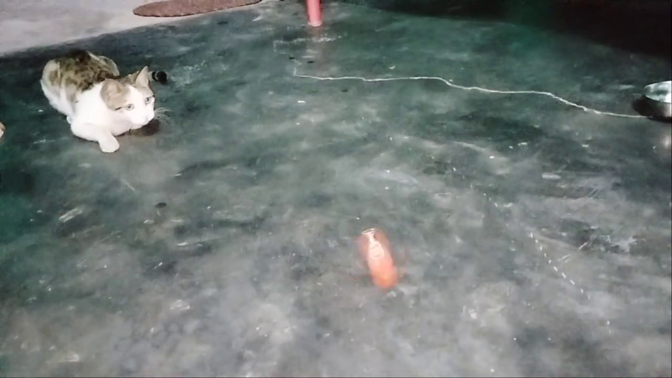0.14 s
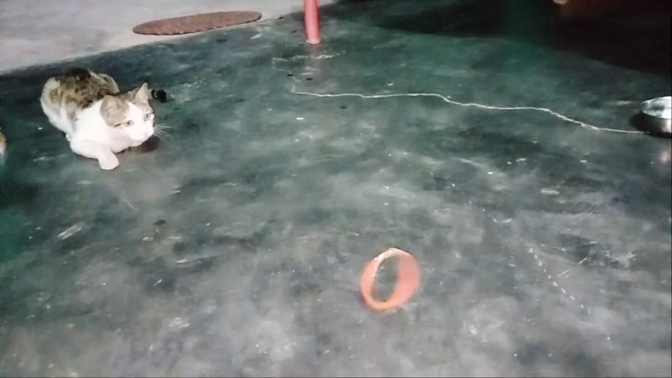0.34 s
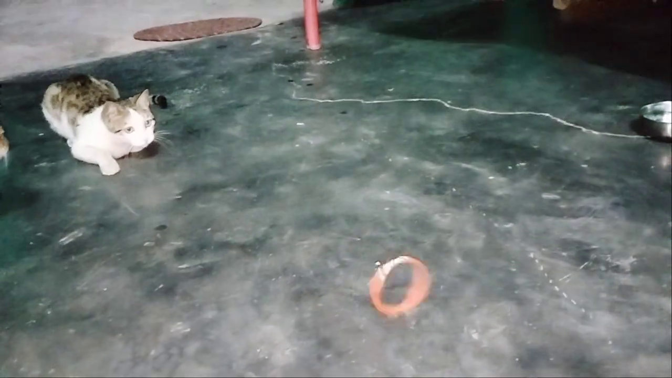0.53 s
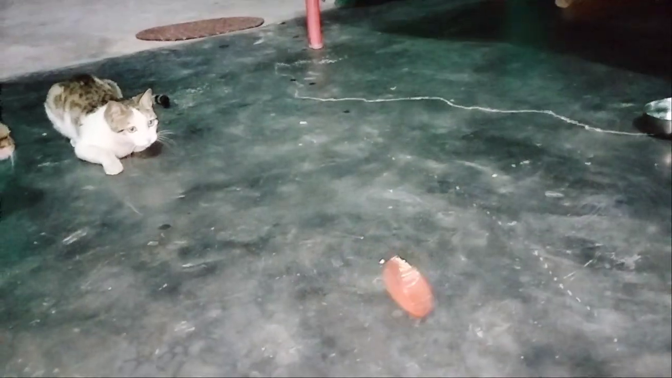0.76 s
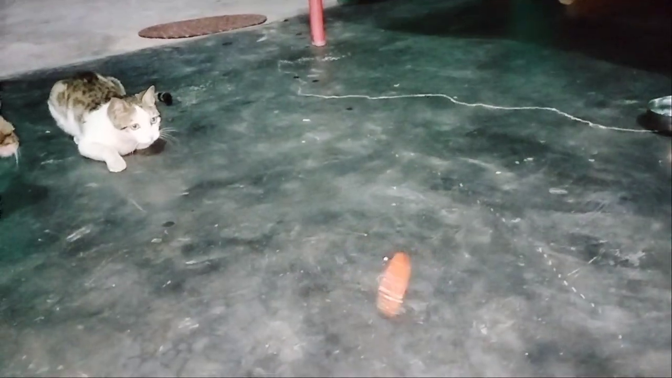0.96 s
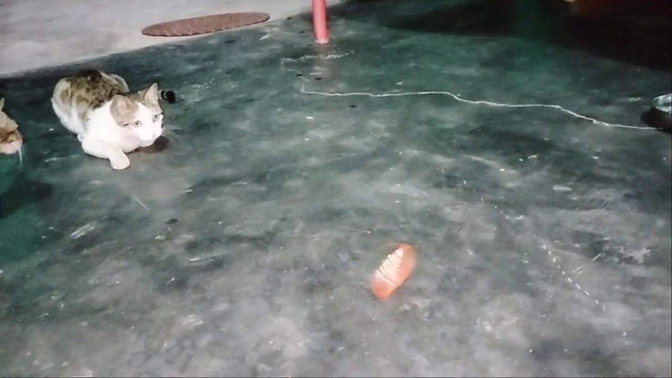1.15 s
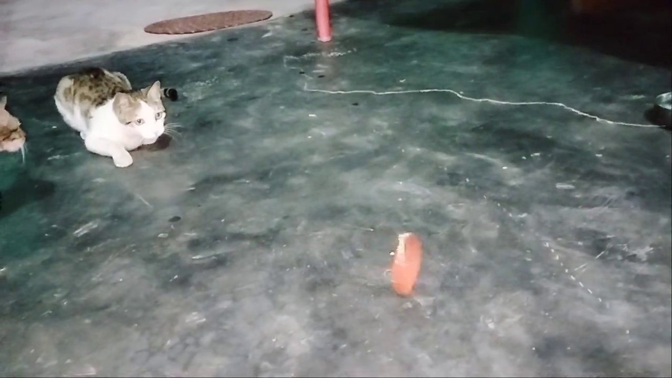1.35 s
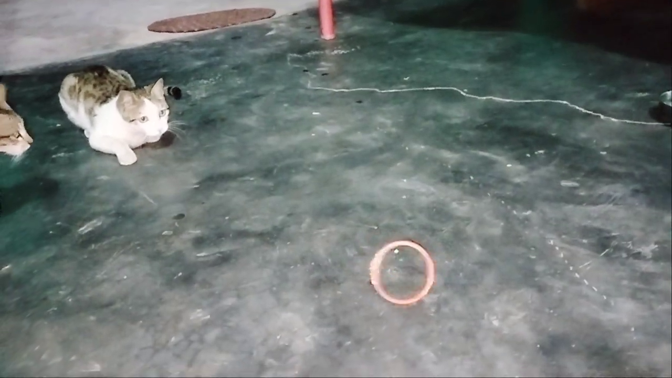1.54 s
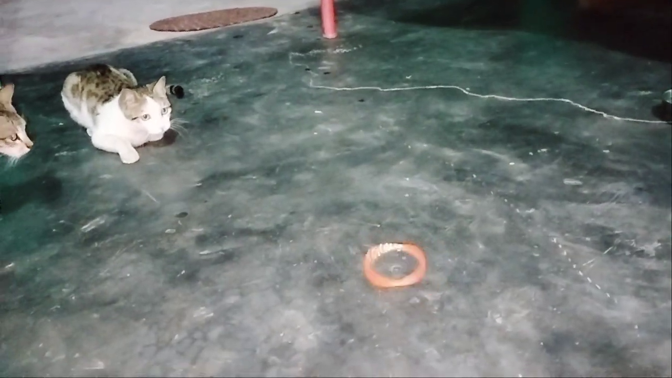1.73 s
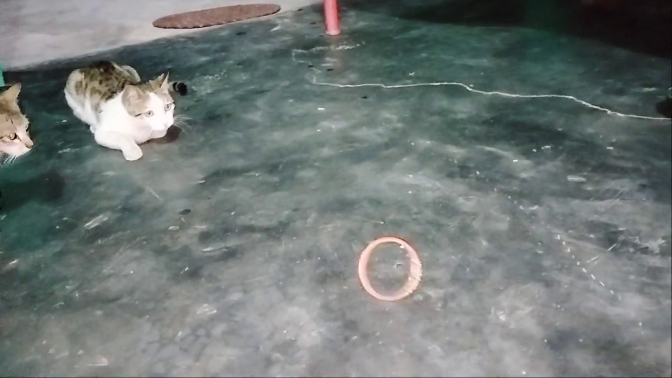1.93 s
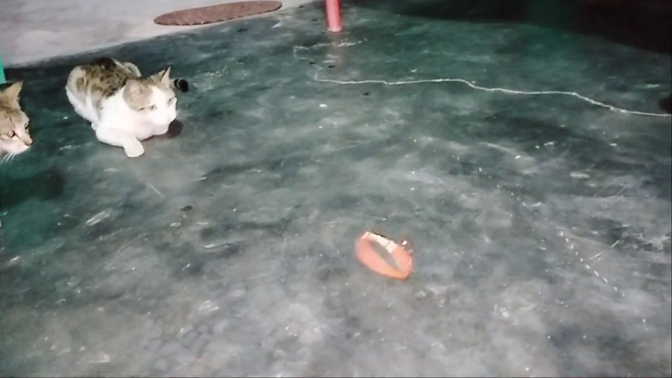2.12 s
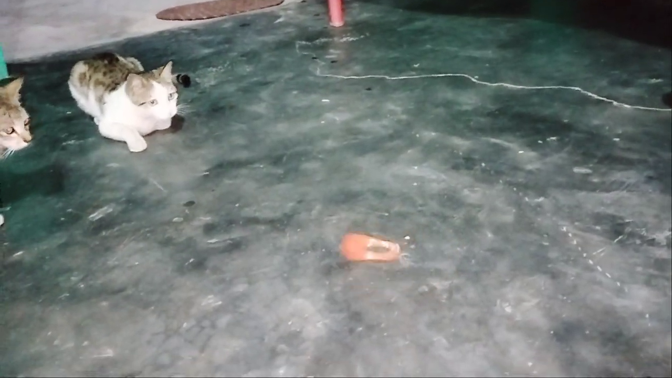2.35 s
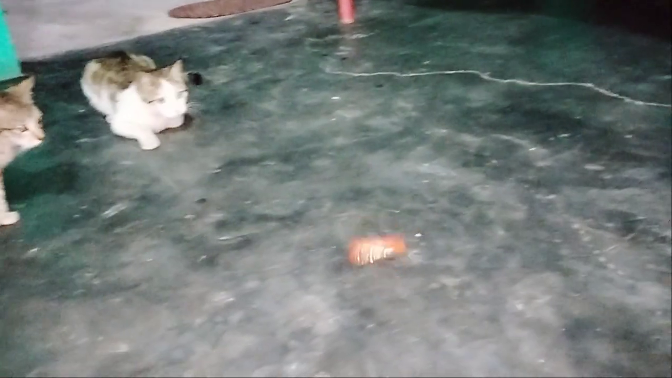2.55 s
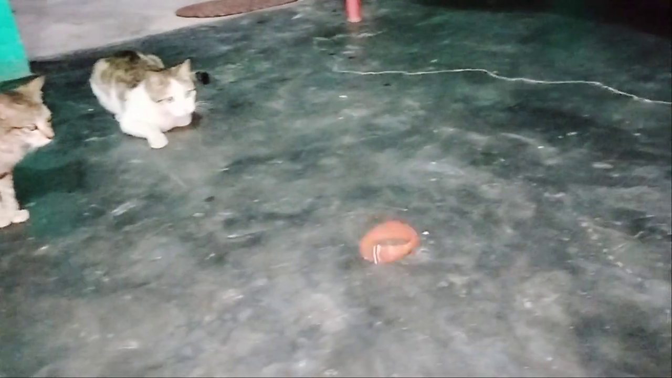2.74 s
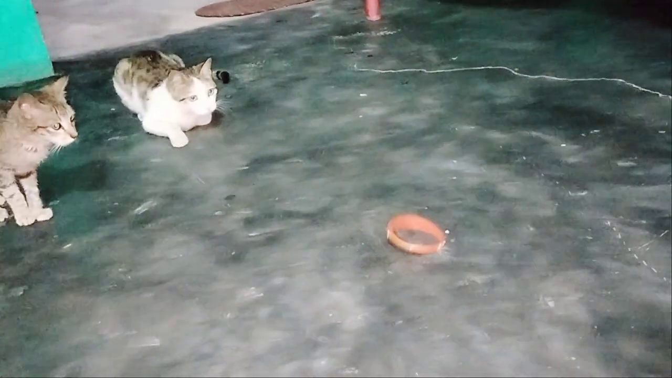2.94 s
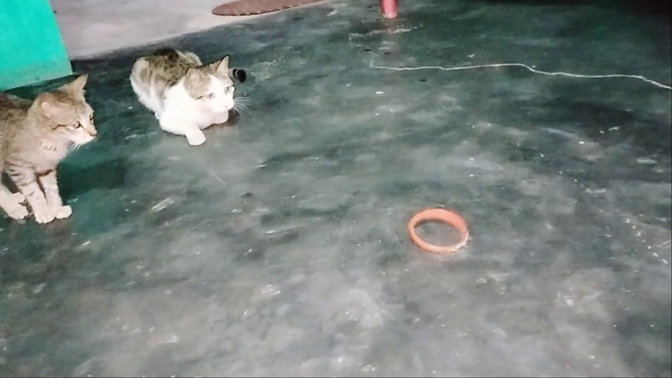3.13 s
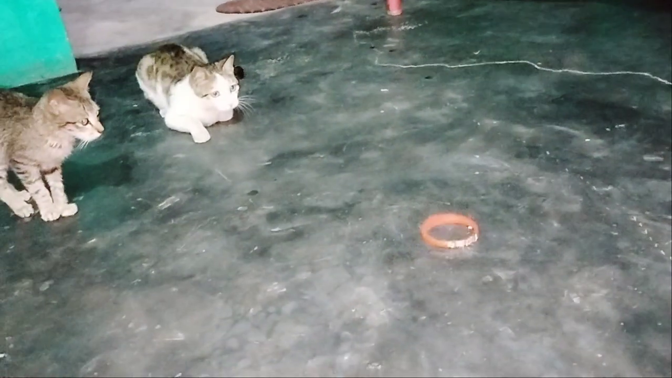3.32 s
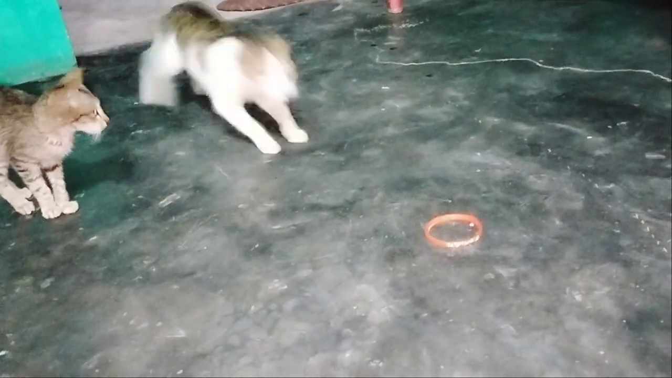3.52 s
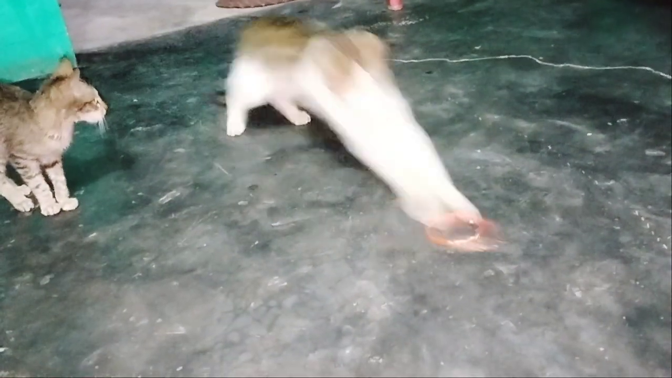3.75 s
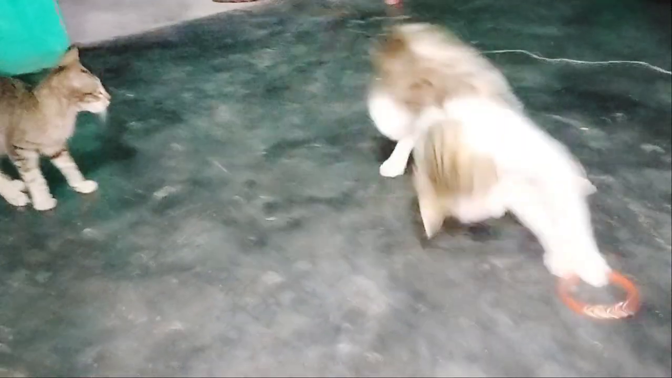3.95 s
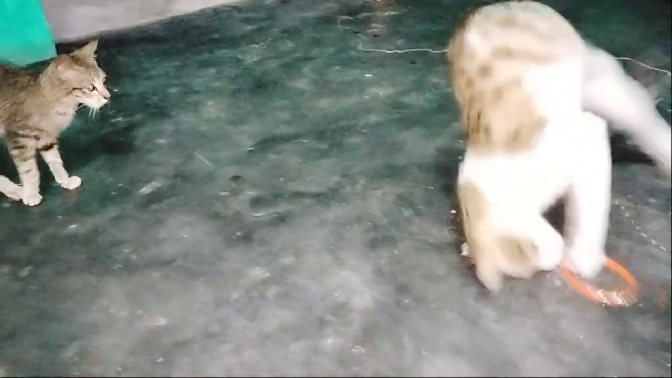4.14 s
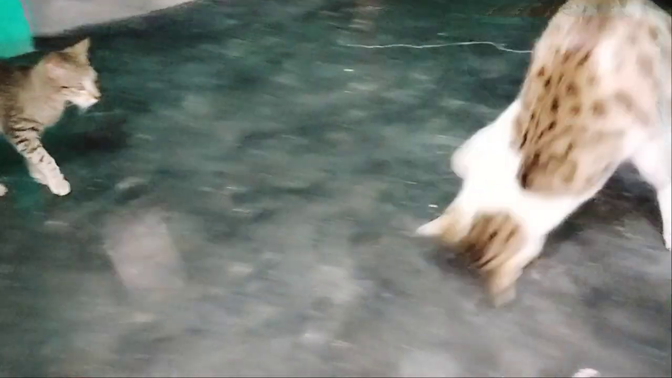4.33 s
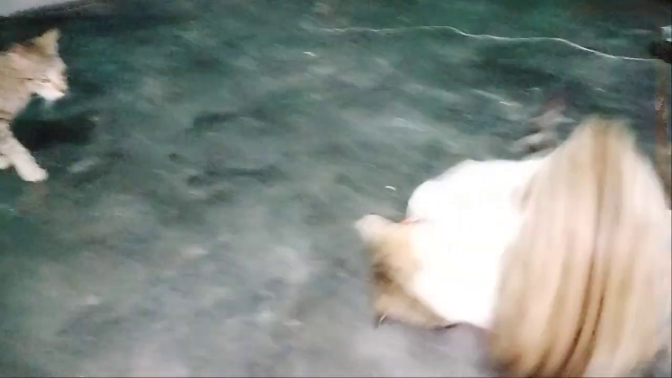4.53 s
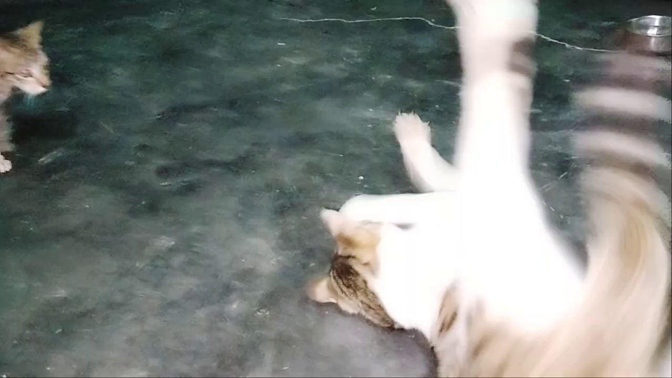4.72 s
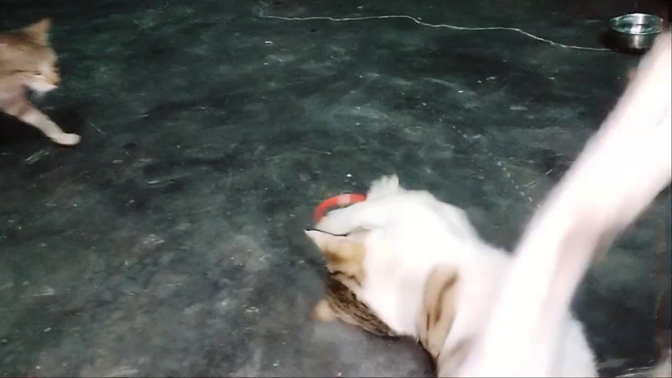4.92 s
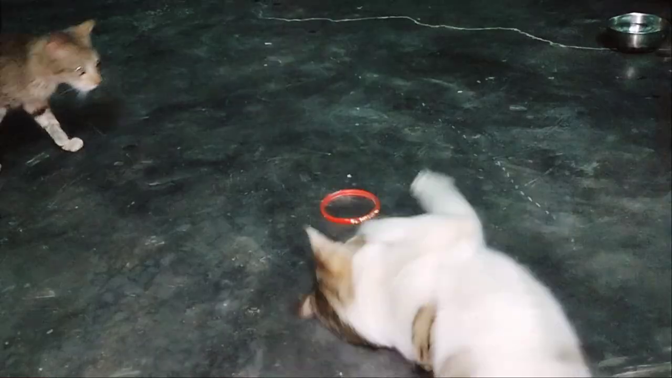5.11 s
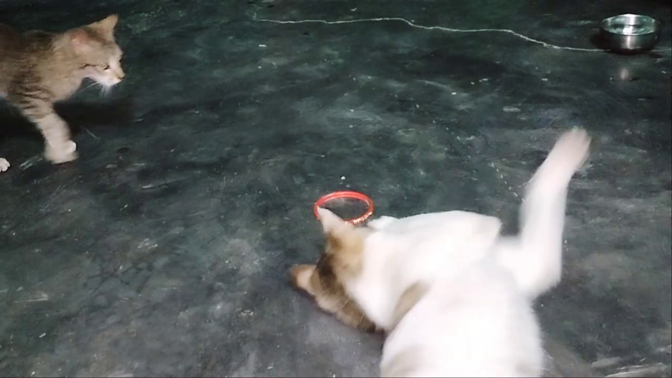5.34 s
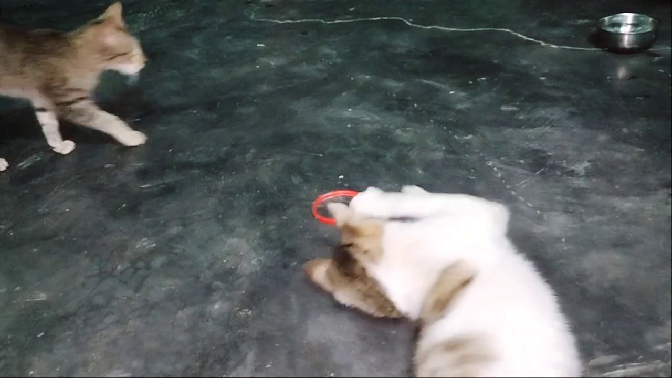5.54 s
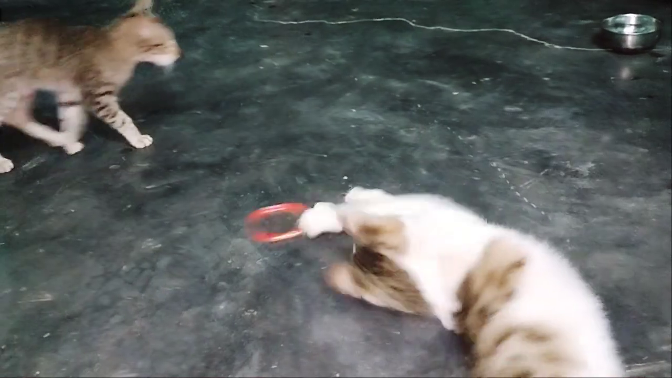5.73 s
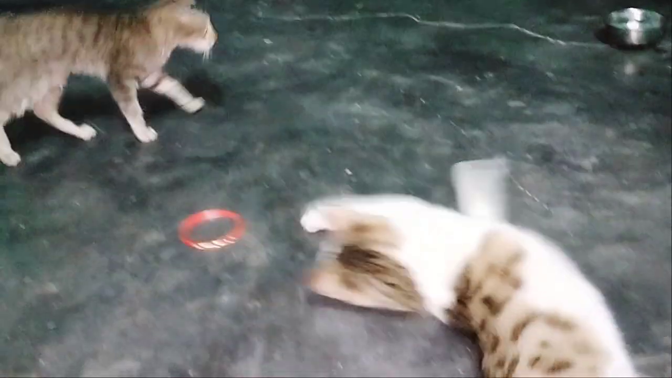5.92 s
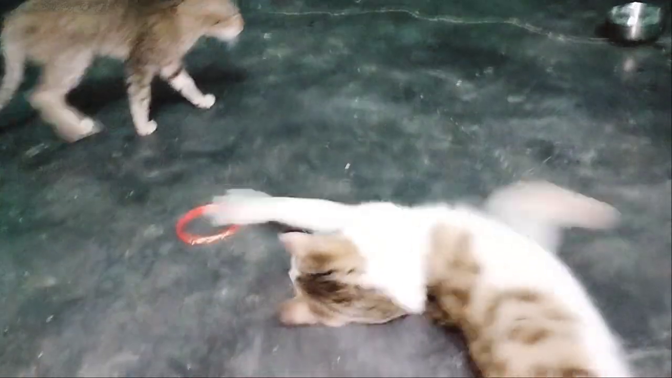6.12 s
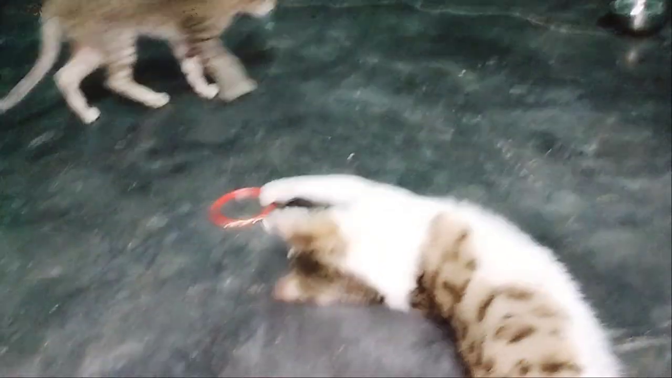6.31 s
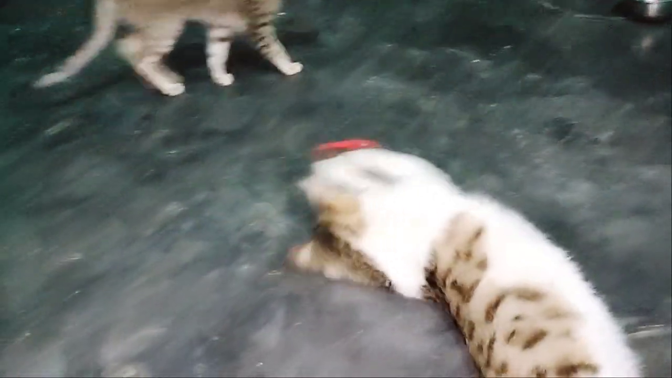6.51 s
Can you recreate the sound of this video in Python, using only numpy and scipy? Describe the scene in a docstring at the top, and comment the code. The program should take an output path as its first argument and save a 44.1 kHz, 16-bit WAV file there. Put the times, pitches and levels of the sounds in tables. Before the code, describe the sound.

A quiet, hard-surfaced room with faint low air noise, heard close by a phone. From 0 to 1.7 s a spinning bangle touches the stone floor lightly: a small flurry of dry clicks at the start, then isolated ticks and soft rubs. Around 2 s the rim hits thicken, and from 2.3 to 3.5 s they become a loud, bright, irregular clatter in quick bursts, with gritty rubbing and a faint hollow ring near 2.9 s. At 3.5 s a soft push-off thud; from 3.6 to 3.95 s the bangle is dragged with a raspy, stuttering squawk and sharp scraping, a paw thud at 3.8. Thinner scrapes follow, then a solid thump with a rattle at 4.4 s, more clacks at 4.7 to 4.8, and another heavy thump at 5.1. Afterwards only weak taps, a short rub at 6.1, and dull fur rustle until 6.5 s.

```python
"""A quiet, hard room with a stone floor: a bangle spins down, its rim clattering in ever quicker runs,
until a cat pounces, drags it along and rolls over on it. A phone is held close.
Rim hits and rubs excite one set of resonances; the hoop and hums are sines, the thuds falling sweeps.
The squawk is grit through narrow modes, the fur dull grit, the air shaped noise, the echo decaying noise."""
import sys
import numpy as np
from scipy import signal
from scipy.fft import rfft, irfft
from scipy.io import wavfile
from scipy.ndimage import uniform_filter1d

SR = 44100
rng = np.random.default_rng(int(sys.argv[2]) if len(sys.argv) > 2 else 0)


def unload_wav(signal):
    """Save mono or channel-first audio to the path in sys.argv[1] as 16-bit WAV at rate SR, clipped to [-1, 1]."""
    wavfile.write(
        sys.argv[1],
        SR,
        np.round(np.clip(np.atleast_2d(signal).T, -1, 1) * 32767).astype(np.int16),
    )


N = 289737
T_S = np.arange(N) / SR

# bangle resonances in five families (near 3.5, 1.7, 4.3 kHz, treble, top): pitch_hz, width_hz, level_db
BANGLE_MODES = [
    [(3215, 1010, -1), (3652, 920, -1)],
    [(1620, 640, 3), (1876, 690, -2.5), (1270, 700, -5.5), (2240, 450, -9)],
    [(4284, 870, 2), (4983, 830, -14.5)],
    [(5270, 1100, -5), (5890, 1100, -9.5), (6902, 1050, -1.5), (7660, 1550, -6), (8740, 1220, -3.5),
     (9850, 1400, -13.5)],
    [(10850, 1100, -9), (12080, 1800, -1), (13200, 1760, -2), (14600, 1500, -5), (15400, 1260, -1)],
]


def undb(db):
    """Decibels to amplitude."""
    return 10 ** (np.asarray(db) / 20)


def ring(x, hz, width_hz, order=3):
    """A resonance applied several times: soft rise, steep skirts."""
    b, a = signal.iirpeak(min(hz, .45 * SR), hz / width_hz, SR)
    return signal.sosfilt(np.tile(np.r_[b, a], (order, 1)), x)


def coloured(x, spectrum):
    """Shape x by (Hz, dB) points and bring it to rms 1."""
    hz, db = np.transpose(spectrum)
    bin_hz = np.arange(len(x) // 2 + 1) * SR / len(x) + 1
    gain = undb(np.interp(np.log(bin_hz), np.log(hz), db))
    y = irfft(rfft(x) * gain, len(x))
    return y / np.std(y)


def walk(rate_hz):
    """Random levels held 1 / rate_hz seconds and slewed; spread near 1."""
    hold = int(SR / rate_hz)
    steps = np.repeat(rng.standard_normal(N // hold + 1), hold)
    return uniform_filter1d(steps, hold)[:N] / 0.77


def grit(rate_hz, spread_db):
    """Random bumps of the stone, a few much larger than the rest; rms 1."""
    chance = rng.random(N) * SR / rate_hz
    at = np.flatnonzero(chance < 1)
    bumps = np.zeros(N)
    polarity = np.sign(chance[at] - .5)
    bumps[at] = polarity * undb(spread_db * rng.exponential(size=len(at)))
    return bumps / np.std(bumps)


def air():
    """Background noise of the room, its level drifting slowly."""
    # pitch_hz, density_db (per Hz)
    air_spectrum = [(18, -72), (30, -73), (64, -4), (194, -4), (252, -17.5), (461, -8), (600, -8.5),
                    (844, -17), (2750, -20.5), (4650, -20.5), (8980, -32), (14400, -31.5), (16000, -33)]
    return coloured(rng.standard_normal(N), air_spectrum) * undb(-72 + 1.5 * walk(6.))


def fur():
    """Rustle of fur and paws: dull grit, also stirred by every rub of the rim."""
    # time_s, level_db
    rustle_levels = [(0, -72), (0.33, -73.5), (0.6, -85), (0.85, -66), (1, -70.5), (1.4, -77), (1.76, -62),
                     (1.92, -53), (2.2, -73.5), (2.86, -61), (3.25, -64), (3.51, -60), (3.6, -67),
                     (3.81, -49), (4.331, -71), (4.45, -50), (4.75, -71.5), (4.95, -61), (5.09, -64),
                     (5.11, -53.5), (5.36, -77), (5.57, -81), (5.68, -67.5), (6.09, -72), (6.17, -62),
                     (6.32, -78.5), (6.57, -68.5)]
    # pitch_hz, density_db (per Hz)
    fur_spectrum = [(88, -13.5), (150, -8), (280, -7.5), (351, -7.5), (742, -4.5), (948, -4.5), (1300, -6),
                    (1690, -0.5), (2860, -120)]
    rustle = undb(np.interp(T_S, *np.transpose(rustle_levels)))
    gain = np.hypot(rustle, undb(-13) * rub_gain(family=1))
    return coloured(grit(2500., spread_db=2.5), fur_spectrum) * gain * undb(2 * walk(40.))


def rub_gain(family):
    """Gain of one family: every rub rises, peaks and falls ever faster."""
    # start_s, rise_s (before lag), level_db near 1.7 kHz, fall_s (20 dB, before share),
    # extra_treble_db, extra_db near 4.3 kHz
    rub_events = [(0.02, 0.053, -65, 0.17, 1.5, 1), (0.25, 0.063, -73, 0.06, -1, 0),
                  (0.738, 0.08, -65, 0.46, -4, 2), (1.07, 0.066, -65.5, .16, -10, -5),
                  (1.39, .005, -69, 1, -3.5, -3), (1.5, .13, -62, .25, 4, 4),
                  (1.74, 0.16, -54.5, 0.27, 0.5, 6), (2.19, 0.079, -59, 0, -13, -12),
                  (2.271, 0.06, -54.5, 0.15, 2.5, -1), (2.483, .04, -50.5, 0.26, 0.5, -9),
                  (2.693, 0.0055, -48.5, 0.2, -3, 2), (2.866, 0.0046, -48, 0.15, 3, 0),
                  (3.004, .005, -49.5, 0.08, -2, 1), (3.134, 0.0038, -54, 0.1, -1.5, -3),
                  (3.258, .005, -53.5, 0.2, 2.5, -10), (3.35, 0.071, -51, 0.2, 4.5, -3),
                  (3.605, .005, -56, 0.57, 1.5, 8.5), (3.675, 0.086, -42.5, 0.2464, 9.5, 12.5),
                  (4.07, .07, -50, .15, 12, 14), (4.28, 0.024, -65, 0.35, 8, 8.5),
                  (4.422, 0.0043, -47, 0.2463, 8, 4), (4.609, 0.064, -49, 0.1348, 4, 7),
                  (4.772, .005, -42, 0.2158, 2.5, 2), (5.029, .04, -70, .08, 17, 19),
                  (5.106, 0.0045, -61.5, 0.22, -4, 3), (5.3, 0.093, -82.5, 0.27, 13, 17),
                  (5.622, 0.0041, -56.5, 0.67, 5, 2.5), (6.096, 0.0041, -44, 0.12, 3, -2),
                  (6.255, .03, -62, .13, 6, 8), (6.334, .02, -52, .42, 3, 4)]
    # level_db per family at no extra treble
    family_db = [-4, 0, -10.5, -11.5, -14]
    # share of the extra treble per family; unused near 4.3 kHz
    treble_share = [0.42, 0.0094, 0, 0.88, 1.08]
    # lag_s per family: 3.5 kHz, treble and top build up about 10 ms later
    family_lag_s = [0.0096, 0, 0, 0.01, 0.011]
    # fall-time factor per family
    fall_share = [0.97, 0.95, 0.84, 0.83, 0.78]
    coarse_s = np.arange(0, N, 64) / SR
    power = 0
    for start_s, rise_s, level_db, fall_s, treble_db, pinned_db in rub_events:
        climb_s = rise_s + family_lag_s[family]
        age_s = coarse_s - start_s - climb_s  # from the peak
        rise_db = 12.5 * age_s / (climb_s + 1e-4)
        fall_db = -20 * (np.abs(age_s) / (fall_s * fall_share[family])) ** 1.5
        shape_db = np.where(age_s < 0, rise_db, fall_db)
        extra_db = pinned_db if family == 2 else treble_share[family] * treble_db
        rub_db = level_db + family_db[family] + extra_db + shape_db
        power = power + (coarse_s > start_s) * undb(rub_db) ** 2
    return np.interp(T_S, coarse_s, np.sqrt(power))


def rim_rubs():
    """Grit drives the bangle: a rasp through the same resonances, with broader skirts than the hits."""
    out = 0
    for family, modes in enumerate(BANGLE_MODES):
        rasp = 0
        for hz, width_hz, db in modes:
            bumps = grit(3000., spread_db=3.0)
            rasp = rasp + undb(db) * ring(bumps, hz, 0.82 * width_hz, order=2)
        chatter = undb(2.1 * walk(60.) - 2.0)  # separate for each family
        out = out + rasp / np.std(rasp) * rub_gain(family) * chatter
    return out


def rim_hits():
    """Every hit lands elsewhere on the rim and weights the resonances anew."""
    # start_s, level_db near 3.5 kHz, then relative to it: low_db near 1.7 kHz,
    # pinned_db near 4.3 kHz, treble_db
    rim_clicks = [(0.027, -49, 0, -8, -22), (0.0354, -51, 1, -13, -19), (0.0514, -47, -1, -8, -19),
                  (0.059, -42.5, -8, -8, -16), (0.0676, -49.5, 7, -7, -20), (0.107, -49, 0, -9, -20),
                  (0.124, -55, 1, -14, -20), (0.3195, -57.5, 4.5, 0, -5), (0.467, -64, 8.5, -7, -10),
                  (0.7392, -51.5, -1, -4, -10), (0.8334, -46.5, -6, -9, -19), (0.8412, -51, 0, -3, -18),
                  (1.074, -45.5, -3.5, -2.5, -16), (1.104, -55, 1, -8, -10), (1.1729, -50, -1, -15, -18),
                  (1.3911, -51.5, -1, 0, -8), (1.3985, -51, -1, -5, -12), (1.472, -55, -7, -17, -17),
                  (1.541, -49, -7, -12, -15), (1.618, -45.5, -5, -2, -18), (1.6273, -45, -8, -8, -17),
                  (1.8596, -48, 0, -7, -17), (1.8718, -50.5, 8, -4, -4), (1.9842, -36.5, -7, -13.5, -15),
                  (1.9963, -41, 0, -2, -21), (2.0053, -45, 0, -11, -12), (2.0142, -48, 7, -12, -22),
                  (2.0768, -49, 3, -15, -24), (2.1256, -53.5, 4, -10, -13), (2.1646, -60, 12, -2.5, -15),
                  (2.2027, -56.5, -6, -4, -18), (2.238, -50.5, 2, -15, -24), (2.2698, -36.5, -5, -20, -25),
                  (2.2835, -33, -5.5, -11, -18), (2.3001, -30.5, 0, -25, -12), (2.3214, -32, -3, -6, -6),
                  (2.3421, -35.5, -6, -15.5, -14), (2.3524, -45, -6, -23, -8), (2.461, -52, 0, -11, -25),
                  (2.4818, -29, -4, -16, -22), (2.5023, -22.5, -9, -31, -23), (2.5135, -38, 5, 2, -1),
                  (2.524, -36.5, -8, -17, -9), (2.5407, -44, -14, -19, -14), (2.55, -27.5, -13, -22, -18),
                  (2.5629, -32, -12, -16, -24), (2.589, -39, 2.5, -11, 0), (2.6123, -39, -6, -2, -6),
                  (2.681, -38.5, -5, -12, -21), (2.693, -33, -1.5, -3, -14), (2.7029, -25.5, -13, -22, -12),
                  (2.7085, -36, -16, -6, -16), (2.7303, -35, -15, -16, -27), (2.74, -35.5, -17, -13, -8.5),
                  (2.7542, -41, -17, -10, -6), (2.7924, -46, -12, -7, -23), (2.8643, -24.5, -13, -26, -21),
                  (2.8724, -36.5, 1.5, -1, 1), (2.8848, -31.5, -13, -7, -3), (2.8958, -37, -20, -9, -9),
                  (3.0035, -31, -19, -20, -18), (3.0095, -42.5, 7.5, 1, -3.5), (3.02, -35, -4, -19, -16),
                  (3.0252, -37.5, -10, -4, -9), (3.1333, -39, 3, -1.5, -5), (3.1413, -33, 0.5, -13, -19),
                  (3.1524, -40, -16, -22, -12), (3.255, -43, 6, 4.5, -4), (3.2638, -28.5, -5, -26, -16.5),
                  (3.2763, -36.5, -9, -8, -3.5), (3.2937, -40.5, -17, -2, -10), (3.3482, -33, -9, -20, -25),
                  (3.355, -41, 4, -7, -4), (3.3616, -28.5, -5, -11, -15), (3.3852, -38, -5, -4, -18),
                  (3.43, -31.5, -1.5, -8, -5.5), (3.4384, -40.5, -5, -15, 2), (3.4825, -33.5, -5, -13, -18),
                  (3.5117, -50, 2, 3, 1), (3.6735, -33, -12, 6, -2), (3.684, -33, -7, -14, -17),
                  (3.6965, -36, -10, 3, -12), (3.7304, -32.5, -13, 6, -3), (3.766, -48, -4, 25.5, 10),
                  (3.8089, -38, -9, 11.5, 6), (3.8295, -51, 10, 17, 10), (3.8363, -44, 2, 13, 8),
                  (3.8426, -55, 1, 21, 7), (3.887, -45, -14, 1, -8), (3.9033, -45.5, -6, 11.5, 1),
                  (4.0544, -40, -5, 2, 12), (4.1116, -38, -9, 0, -1), (4.166, -45, -5, -17, -1),
                  (4.1976, -59, 1, 9, 16), (4.3246, -66, 10, 15, 14), (4.394, -61, 12, 7, 0),
                  (4.4037, -51, -12, 2, 2), (4.4203, -31.5, -5, -4, 3), (4.4328, -57, 19, 7, 13),
                  (4.448, -29.5, -9, -24, -3), (4.458, -34, -3, -14, -4), (4.4686, -33, -7, -23, -9),
                  (4.4796, -41, -3, -18, -14), (4.661, -41, -15, 2, -18), (4.6797, -39, 3, -15, -16),
                  (4.7806, -35.5, 6, -2.5, -11), (4.8016, -36.5, 7, 5, -2), (4.8107, -55.5, 10, 1, 18.5),
                  (5.0712, -52.5, -11, 10.5, -16), (5.1062, -32.5, -6.5, -15, -16),
                  (5.621, -50, -14, 6.5, 2.5), (5.6754, -55.5, 11, -11, 2), (5.7262, -51, -10, -7, -6),
                  (5.7994, -55, 7, -2, -4), (5.841, -54, 8, -2, -2), (5.8562, -47, -16, -18.5, -13),
                  (5.943, -67, 19.5, 14, 9.5), (6.097, -44, -13, 4.5, 1), (6.3335, -47, 2, -8, -8),
                  (6.4576, -61, 4, 20, -1), (6.465, -46, -7, 3, -8.5)]
    start_s, level_db, low_db, pinned_db, treble_db = np.transpose(rim_clicks)
    at = (start_s * SR).astype(int)
    # above 10 kHz a hit follows its treble, more steeply
    top_db = -5 + 1.35 * treble_db + 3.0 * rng.standard_normal(len(at))
    relative_db = [0 * start_s, low_db, pinned_db, treble_db, top_db]
    crunch_s = np.arange(400) / SR
    impulse = np.eye(1, 2000)[0]
    out = 0
    for family, modes in enumerate(BANGLE_MODES):
        response = 0
        for m, (hz, width_hz, db) in enumerate(modes):
            response = response + (-1) ** m * undb(db) * ring(impulse, hz, width_hz, order=5)
        peak = np.max(np.abs(response))
        for m, (hz, width_hz, db) in enumerate(modes):
            scatter_db = rng.standard_normal(len(at))
            blows = np.zeros(N)
            np.add.at(blows, at, undb(level_db + relative_db[family] + scatter_db) / peak)
            if hz > 5000:  # the treble comes from a brief crunch, not one clean blow
                crunch = rng.standard_normal(len(crunch_s)) * np.exp(-crunch_s / .0012)
                crunch = 1.33 * crunch / np.sqrt(np.sum(crunch ** 2))
                blows = signal.oaconvolve(blows, crunch)[:N]
            out = out + (-1) ** m * undb(db) * ring(blows, hz, width_hz, order=5)
    return out


def room(x):
    """Decaying noise, octave by octave, the treble dying first; energy 1."""
    # pitch_hz, t60_s
    room_decay = [(250, 0.42), (1500, 0.3), (4000, 0.28), (10000, 0.24)]
    tail_s = np.arange(SR // 2) / SR
    hz, t60_s = np.transpose(room_decay)
    tail = 0
    for octave_hz in 125 * 2. ** np.arange(8):
        b, a = signal.iirpeak(octave_hz, 1.4, SR)
        band = signal.lfilter(b, a, rng.standard_normal(len(tail_s)))
        band_t60_s = np.interp(np.log(octave_hz), np.log(hz), t60_s)
        tail = tail + band * undb(-60 * tail_s / band_t60_s)
    tail = tail * (tail_s > .003)
    return signal.fftconvolve(x, tail / np.sqrt(np.sum(tail ** 2)))[:N]


def hums():
    """Low, narrow, rough tones that swell and fade."""
    # start_s, length_s, pitch_hz, level_db
    hum_events = [(1.55, .2, 177, -68), (4.5, .25, 180, -68), (3.52, .18, 300, -67), (5.95, .2, 130, -75),
                  (2.7, .08, 230, -70)]
    out = np.zeros(N)
    for start_s, length_s, hz, db in hum_events:
        phase = 2 * np.pi * np.cumsum(hz * (1 + .025 * walk(60.))) / SR
        tone = np.sin(phase) * undb(3 * walk(30.))
        swell = np.sin(np.pi * np.clip((T_S - start_s) / length_s, 0, 1)) ** .5
        out += np.sqrt(2) * undb(db) * tone * swell
    return out


def thuds():
    """Paws and body land: a short sweep, falling as the weight settles, over a dull broad bump."""
    # start_s, level_db (before 2 dB gain), first_hz, last_hz, t60_s
    thud_events = [(1.747, -50.5, 256, 203, 0.11), (3.465, -47, 465, 192, 0.067),
                   (3.775, -41, 746, 257.5, 0.19), (4.389, -42.5, 790, 490, 0.039),
                   (4.428, -27, 1079, 312, 0.045), (5.101, -26.5, 1306, 324, 0.052)]
    out = np.zeros(N)
    dull_spectrum = [(50, -40), (110, -13.5), (200, -3), (400, -3.5), (1200, -12.5), (2500, -20.0),
                     (9000, -40.0)]
    dull = coloured(rng.standard_normal(N), dull_spectrum)
    for start_s, db, first_hz, last_hz, t60_s in thud_events:
        age_s = np.maximum(T_S - start_s, 0)
        hz = last_hz + (first_hz - last_hz) * np.exp(-(age_s / 0.00716) ** 2)
        sweep = np.sin(2 * np.pi * np.cumsum(hz * (age_s > 0)) / SR)
        shape = (1 - np.exp(-age_s / 0.002)) * undb(db + 2.0 - 60 * age_s / t60_s)
        out += shape * (sweep + 0.34 * dull)
    return out


def hoop():
    """A low bending mode rings on from a few moments of its own, wavering as the hoop wobbles."""
    # start_s, level_db
    hoop_rings = [(1.899, -55.5), (2.701, -63.5), (2.866, -51.5), (3.01, -66), (3.14, -76), (3.265, -64)]
    pitch_hz, t60_s = 917, .75
    level = np.zeros(N)
    phase = 2 * np.pi * np.cumsum(pitch_hz * (1 + .004 * walk(30.))) / SR
    for start_s, db in hoop_rings:
        age_s = np.maximum(T_S - start_s, 0)
        level += (T_S > start_s) * undb(db - 60 * age_s / t60_s)
    return level * np.sin(phase) * undb(2.4 * walk(30.))


def squawk():
    """The dragged, pinned bangle: stick-slip grit rings narrow modes, each one stuttering."""
    # time_s, rms_db
    squawk_levels = [(3.598, -93), (3.608, -45.5), (3.665, -49), (3.69, -58), (3.73, -49), (3.8, -42),
                     (3.86, -50.5), (3.95, -56), (3.97, -71.5)]
    # pitch_hz, width_hz, level_db
    squawk_modes = [(668, 60, -10), (947, 70, 0), (1430, 110, -7), (2080, 90, -7), (2770, 90, -7),
                    (3590, 100, -5), (4300, 180, -4)]
    slips = grit(4000., spread_db=2.5)
    tone = 0
    for hz, width_hz, db in squawk_modes:
        mode = ring(slips, hz, width_hz, order=2) / np.sqrt(width_hz)
        tone = tone + undb(db + 3 * walk(120.)) * mode
    level_db = np.interp(T_S, *np.transpose(squawk_levels), left=-200, right=-200)
    return tone / np.std(tone) * undb(level_db)


def scene():
    """Sum the direct sounds, their echo and the air."""
    hits, rubs, knocks, drag = rim_hits(), rim_rubs(), thuds(), squawk()
    echo = room(undb(-8) * hits + undb(-10) * (rubs + drag) + undb(-7.5) * knocks)
    return (hits + rubs + drag + hoop() + fur() + knocks + hums() + echo + air())[None]


def record(dry):
    """The microphone falls away below the bass and above its last peak; the recorder cuts the top."""
    soft = signal.sosfilt(signal.butter(4, 56, "high", fs=SR, output="sos"), dry)
    soft = signal.sosfilt(signal.ellip(5, .5, 22, 15750, fs=SR, output="sos"), soft)
    return signal.sosfilt(signal.ellip(10, .2, 80, 16700, fs=SR, output="sos"), soft)


dry = scene()
out = record(dry)
unload_wav(out)
```